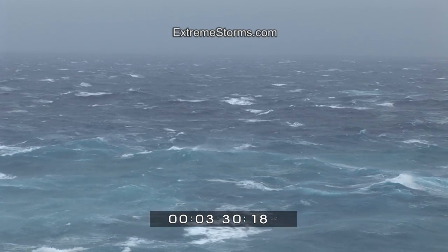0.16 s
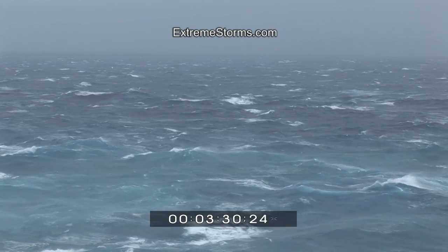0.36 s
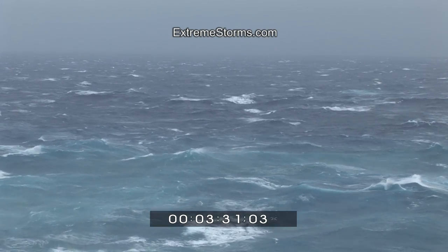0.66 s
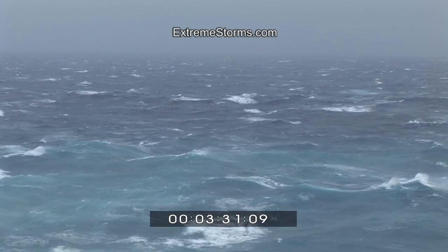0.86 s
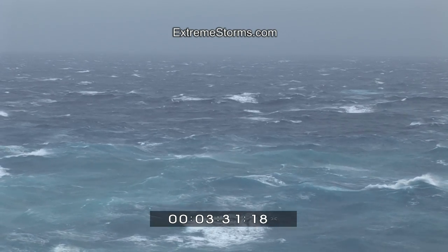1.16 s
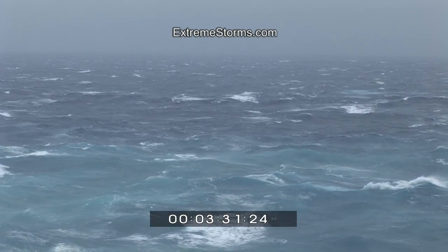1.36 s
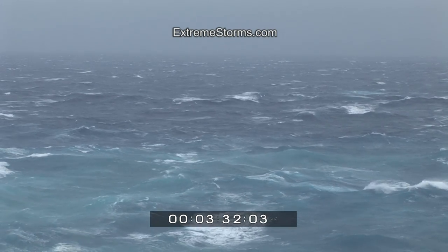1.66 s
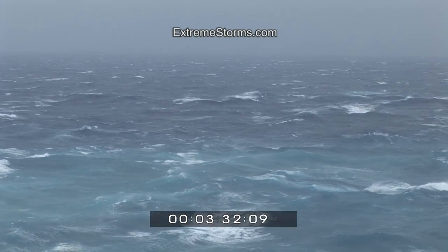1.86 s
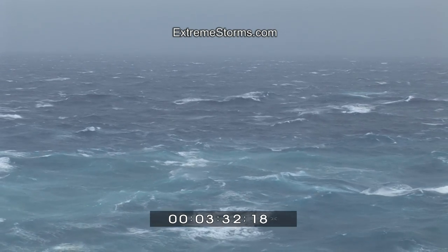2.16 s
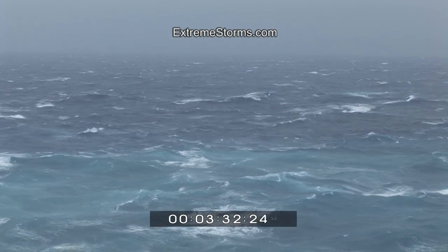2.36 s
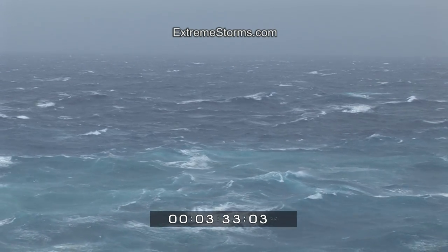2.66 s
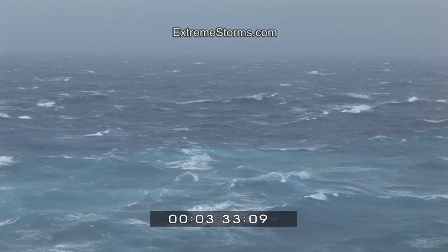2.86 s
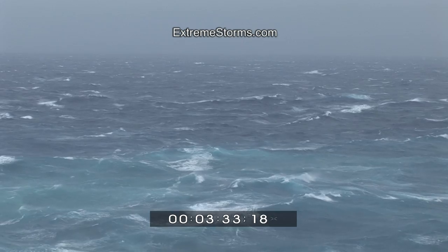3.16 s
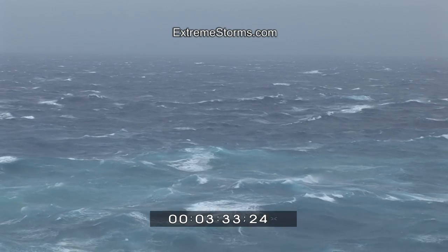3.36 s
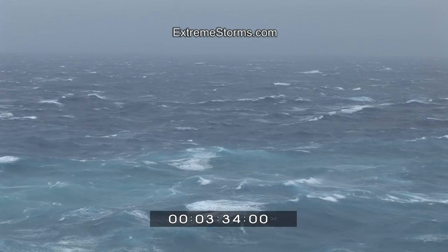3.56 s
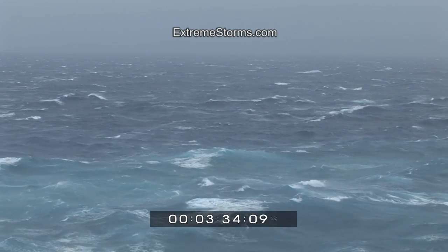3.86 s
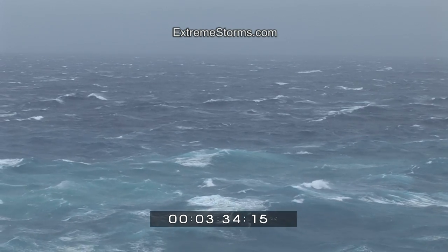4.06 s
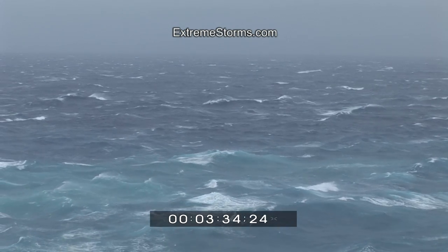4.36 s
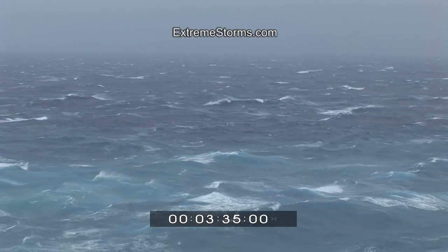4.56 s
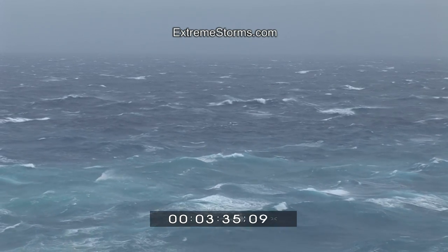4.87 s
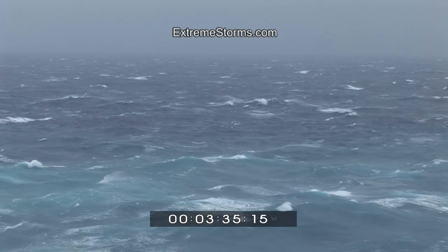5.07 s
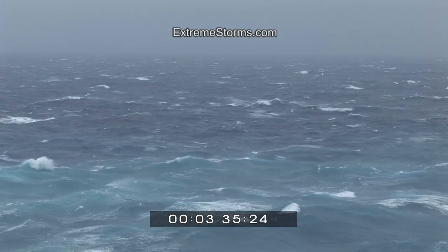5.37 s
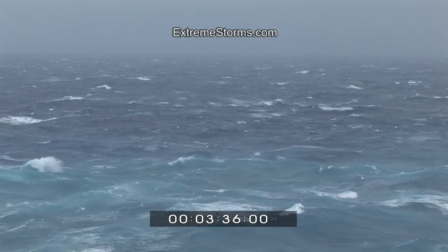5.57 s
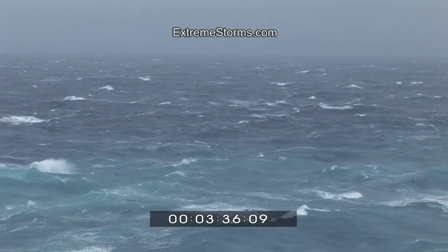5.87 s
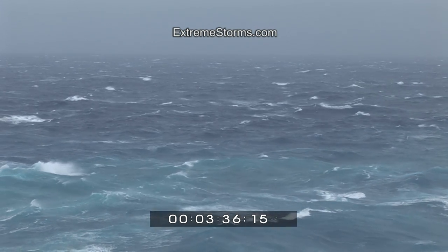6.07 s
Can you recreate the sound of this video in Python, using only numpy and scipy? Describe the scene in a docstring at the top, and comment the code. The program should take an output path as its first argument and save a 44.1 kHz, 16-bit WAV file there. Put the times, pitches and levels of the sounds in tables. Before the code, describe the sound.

Continuous low, fluttering wind buffeting on a camcorder microphone, broken by scratchy clicks, a cluster of thumps midway and crackly rubbing of the cover.

```python
"""Storm wind on a covered microphone

Storm wind buffets the covered microphone of a tape camcorder on a cliff: noise in bands rumbles and roars.
The cover ticks (scratchy bursts and a ring) and rustles (crackly treble noise).
Dull knocks and soft low wobbles in the wind are sine swings, from one swing to a short ring of about six.
Steady hiss lies underneath, with a faint whine of the head drum made of many sine tones.
The right channel hears the same pressure inverted, a little late and with less bass and treble."""
import sys
import numpy as np
from scipy import signal
from scipy.fft import rfft, irfft, next_fast_len
from scipy.io import wavfile
from scipy.ndimage import uniform_filter1d

SR = 44100
rng = np.random.default_rng(int(sys.argv[2]) if len(sys.argv) > 2 else 0)


def inscribe(sig):
    """Save sig as 16-bit PCM at rate SR to the path in sys.argv[1].

    A 1-D sig is mono; a 2-D sig holds one channel per row.
    Samples are clipped to [-1, 1] before scaling.
    """
    pcm = np.round(np.clip(np.atleast_2d(sig).T, -1, 1) * 32767)
    wavfile.write(sys.argv[1], SR, pcm.astype(np.int16))


N = 273532
SIZE = next_fast_len(N)
HZ = np.arange(SIZE // 2 + 1) * SR / SIZE + 1e-3  # pitch of each spectrum bin, kept above zero for logs

# colour of the wind noise before gusts and flutter: (frequency [Hz], density [dB per Hz])
WIND_COLOUR = [(15, -68.5), (45, -52.5), (130, -55), (400, -58.5), (620, -62), (830, -68.5), (1020, -68.5),
               (1300, -75.5), (2200, -86), (2750, -95), (3400, -99), (4500, -109), (5200, -103.5),
               (6100, -105.5), (7200, -125)]


def undb(db):
    """Turn decibels into a gain."""
    return 10 ** (np.asarray(db) / 20)


def curves(table):
    """Draw the columns of a time table as lines, one value per sample."""
    times, *columns = np.transpose(table)
    t = np.arange(N) / SR
    return [np.interp(t, times, column) for column in columns]


def coloured(points, source):
    """Spectrum of a source, coloured by (Hz, dB per Hz) points; the densities hold for unit power."""
    hz, db = np.transpose(points)
    density_db = np.interp(np.log(HZ), np.log(hz), db, -200, -200)
    return rfft(source, SIZE) * undb(density_db) * np.sqrt(SR / 2)


def walk(rate, settle_s=0.28):
    """Random levels held for 1 / rate seconds, smoothed twice, less their slow average; spread near 1."""
    hold = int(SR / rate)
    steps = np.repeat(rng.standard_normal(N // hold + 1), hold)
    smooth = uniform_filter1d(uniform_filter1d(steps, hold), hold)[:N]
    return 1.08 * (smooth - uniform_filter1d(smooth, int(settle_s * SR)))


def grains(rate, spread_db):
    """Dense clicks of very unequal size, about rate per second, with unit power."""
    happens = rng.random(N) < rate / SR
    clicks = rng.standard_normal(N) * happens * undb(spread_db * rng.exponential(size=N))
    return clicks / np.std(clicks)


def add(out, s, sound):
    """Mix a short sound in at s seconds."""
    i = int(s * SR)
    out[i:i + len(sound)] += sound[:N - i]


def wind(all_db=0.74, shared_db=0.86, own_db=1.0):
    """Turbulence in overlapping bands: each follows the gusts, flutters with its neighbour and flickers alone."""
    # slow gusts, of which only the swing about each column's mean is used:
    # (time [s], rumble level [dB], roar level [dB], hissing top level [dB])
    gust = [(0.0, -41, -45.5, -59), (0.52, -42, -47.5, -60), (0.55, -44.5, -47, -60.5),
            (0.76, -41, -47.5, -62), (.95, -40, -45.5, -59), (1.07, -42, -47.5, -59.5),
            (1.2, -36.5, -46.5, -60), (1.33, -41, -46, -61), (1.45, -41.5, -46.5, -60),
            (1.98, -43, -47.5, -62), (2.47, -41.5, -48, -60), (2.76, -41.5, -48.5, -60.5),
            (2.81, -50.5, -46, -60), (2.85, -39, -49, -62.5), (2.95, -35, -44, -60.5),
            (3.02, -33, -46, -60), (3.06, -39.5, -46.5, -60.5), (3.28, -36.5, -47, -59.5),
            (3.47, -39.5, -46.5, -60.5), (3.87, -37, -45.5, -60), (4.28, -38.5, -47.5, -60.5),
            (4.44, -35.5, -47.5, -60), (4.59, -39, -47.5, -62.5), (5.23, -39, -48, -60.5),
            (5.45, -36.5, -46.5, -61), (5.65, -38.5, -45.5, -59.5), (5.84, -36.5, -47, -59.5),
            (5.96, -42, -44.5, -61.5), (5.99, -32.5, -46, -59), (6.2, -40, -46.5, -60.5)]
    swings = [column - column.mean() for column in curves(gust)]
    spectrum = coloured(WIND_COLOUR, rng.standard_normal(N))
    out, last, buffet = 0, walk(14), walk(14)
    for step in range(19):
        octave = np.log2(HZ / 16) - step / 2  # distance from the band centre; centres are half an octave apart
        band_shape = np.cos(np.pi * np.clip(octave, -.5, .5)) ** 2
        band = irfft(spectrum * band_shape, SIZE)[:N]
        # 0 is rumble, 1 is roar, 2 is the hissing top; bands between them blend two gust columns
        place = np.interp(step, (6, 10, 13, 15), (0, 1, 1, 2))
        gust_db = sum(max(1 - abs(place - k), 0) * swing for k, swing in enumerate(swings))
        new = walk(9)
        flutter_db = all_db * buffet + shared_db * (new + last) + own_db * walk(21.93)
        out = out + band * undb(gust_db + flutter_db)
        last = new
    return out


def electronics(whine_db=-101, odd_db=-3, low_db=15):
    """Preamplifier hiss, and the overtones of the head drum leaking into each channel as sine tones."""
    hiss_db, hiss_top_hz = (-117, -118), 13520  # left and right density [dB per Hz]; upper edge
    drum_hz = 149.85
    hiss = irfft(rfft(rng.standard_normal((2, SIZE))) * (HZ < hiss_top_hz), SIZE)[:, :N]
    hiss = hiss * undb(hiss_db)[:, None] * np.sqrt(SR / 2)
    lines = np.zeros((2, len(HZ)), complex)
    for k in range(20, int(hiss_top_hz / drum_hz)):
        scatter_db = 2.5 * rng.standard_normal(2)
        # odd overtones are weaker, the lowest ones stronger
        db = whine_db + odd_db * (k % 2) + low_db * np.exp(-(k - 20) / 12) + scatter_db
        phase = np.exp(2j * np.pi * rng.random(2))
        lines[:, int(k * drum_hz * SIZE / SR)] = undb(db) * phase * SIZE / np.sqrt(2)
    whine = irfft(lines, SIZE)[:, :N] * undb([[0], [-3]])  # weaker on the right
    return hiss + whine


def ticks(grip_s=0.00099, contact_s=0.0013, late_s=0.0012, rise_s=0.0011, blur=1.3, spread=1.46):
    """A scratchy contact of a few ms: a broad crack, a spit on top, then a short rough ring of the housing."""
    # hard ticks on the housing: (time [s], ring peak [dB], ring pitch [Hz], ring time to fall 60 dB [s],
    # spit peak above the ring's [dB], crack peak above the ring's [dB], crack centre [Hz])
    hits = [(0.268, -42, 5200, .015, -14, 8, 2510), (0.2885, -57, 5700, .009, -6, 8, 3400),
            (0.5778, -45.5, 5250, 0.016, -17, 10.5, 2300), (.587, -65, 5600, .009, -14, 2, 2600),
            (.696, -53, 5300, .012, -12, 0, 3000), (1.223, -56, 5400, .008, 2, -2, 4000),
            (1.323, -51.5, 5200, .01, -11, 7, 3200), (1.9435, -61, 5400, .008, -2, 8, 2500),
            (2.4448, -45.5, 5130, .012, -16, 4, 2570), (2.8388, -55, 5330, .008, -10, 22, 2060),
            (2.9197, -64, 5300, .01, -8, 18, 2900), (2.948, -62, 5300, .01, -6, 14, 3200),
            (2.9793, -49, 5740, .009, -3, 11.5, 3040), (3.0045, -52, 5900, .008, -2, 5, 4300),
            (3.632, -58, 5100, .01, -8, 8, 3300), (3.915, -52.5, 5700, .009, -10, 8, 3300),
            (3.929, -56, 5700, .009, -20, 0, 3000), (3.962, -57, 5300, .009, -16, 2, 3000),
            (4.343, -63, 5200, .007, -6, 15, 2700), (4.375, -55, 5500, .007, -3, 6, 3900),
            (4.8814, -46, 5550, .007, -5, 4.5, 3400), (5.845, -53.5, 5530, .007, -5, 4, 3400)]
    # ways the housing rings: (multiple of the ring pitch [ratio], level [dB], share of the ring time [ratio])
    housing = [(1, 0, 1), (1.17, 0, .45), (.84, -11, 0.21)]
    out, t = np.zeros(N), np.arange(SR // 32) / SR
    spit_band = signal.butter(2, (3800, 12500), "bandpass", fs=SR, output="sos")
    for s, db, hz, ring_s, spit_db, crack_db, crack_hz in hits:
        chance = rng.standard_normal(len(t))
        contact = chance * (1 - np.exp(-t / grip_s)) * np.exp(-t / contact_s)
        crack_edges = (crack_hz / spread, crack_hz * spread)
        crack_band = signal.butter(2, crack_edges, "bandpass", fs=SR, output="sos")
        dulled = signal.lfilter([1], [1, -.95], contact)
        crack = signal.sosfilt(crack_band, dulled)
        spit = signal.sosfilt(spit_band, contact)
        ring = sum(undb(mode_db) * np.sin(2 * np.pi * multiple * hz * t) * 1000 ** (-t / (share * ring_s))
                   for multiple, mode_db, share in housing)
        rough = 1 + blur * uniform_filter1d(chance[::-1], size=25)
        ring = ring * (1 - np.exp(-t / rise_s)) * rough
        for part, part_db, lag_s in ((ring, 0, late_s), (crack, crack_db, 0), (spit, spit_db, 0)):
            add(out, s + lag_s, undb(db + part_db) * part / abs(part).max())
    return out


def knocks_and_wobbles():
    """The pressure swings to and fro: from one swing to a short ring of about six, in a bell shape."""
    # dull knocks and soft low wobbles in the wind:
    # (time of the middle [s], peak [dB], swing pitch [Hz], width of the bell [swings])
    blows = [(.272, -27.5, 1070, 6.4), (.579, -25.5, 1000, 1.6), (2.8404, -15.5, 640, 1.4),
             (2.8425, -20.5, 520, 1.1), (2.8463, -25.5, 220, 0.83), (2.943, -35, 300, 0.81),
             (2.981, -10, 686, 1), (2.9835, -20, 320, 1.9), (2.989, -32, 800, 1.2), (3.0098, -21, 700, 2),
             (3.0128, -12.5, 497, 1.16), (3.0155, -25, 370, 2.3), (3.022, -27, 520, 2),
             (3.0295, -11.5, 430, 1.4), (3.0328, -14, 250, 2.3), (3.049, -26, 580, 3),
             (3.086, -20.5, 676, 1.7), (3.31, -33, 1400, 4), (3.3168, -32, 1410, 5.5),
             (3.323, -34, 1300, 4), (3.863, -34, 1650, 3.7), (3.874, -18, 900, 1.14),
             (3.875, -38, 1450, 3.3), (3.9072, -29, 1250, 1.6), (3.912, -25, 900, 1.3),
             (4.159, -24, 480, 1.1), (4.1617, -20, 950, 1.2), (5.545, -29, 800, 1.1),
             (6.0452, -23.5, 596, 3.3)]
    out, t = np.zeros(N), np.arange(-400, 400) / SR
    for s, db, hz, swings in blows:
        bell = np.exp(-(2.7 * t * hz / swings) ** 2)
        swing = -np.sin(2 * np.pi * hz * t) * bell
        add(out, s + t[0], undb(db) * swing / abs(swing).max())
    return out


def rustle(rise_s=0.0091, fall_s=0.024, split_hz=8500, fray_db=2.5):
    """Rubbing fabric: short stretches of crackly treble noise that fray band by band, some brighter."""
    # colour of the rubbing before each rub's own gain: (frequency [Hz], density [dB per Hz])
    colour = [(2000, -25), (3200, -25), (4400, -37.5), (5300, -27.5), (6200, -31.5), (6700, -46),
              (7500, -40), (10000, -41), (12300, -35), (13400, -33), (14250, -36), (14500, -55)]
    # rubs of the cover: (time [s], length [s], gain [dB], treble raised and the rest lowered by [dB])
    rubs = [(0.692, 0.026, -75, 0), (1.002, .045, -78, -2), (2.967, 0.041, -70.5, -5),
            (3.034, 0.091, -76.5, -3), (3.126, 0.022, -71, 10), (3.144, .022, -80, 8),
            (3.165, 0.088, -68, 3.5), (3.166, .014, -74, 5), (3.187, .016, -75, 1), (3.208, .036, -69, 2),
            (3.225, 0.019, -69, -4), (3.56, 0.033, -80, -5), (3.596, 0.038, -73, -4.5),
            (3.895, 0.044, -76, -4), (3.96, .08, -79, -1), (5.005, 0.091, -81, 1), (5.377, .03, -76, -4)]
    rub = coloured(colour, rng.standard_normal(N) + 0.31 * grains(4000, 3.0))
    low, high = 0, 0
    for step in range(11):
        octave = np.log2(HZ / 1800) - step / 3  # band centres a third of an octave apart
        band_shape = np.cos(np.pi * np.clip(1.5 * octave, -.5, .5)) ** 2
        band = irfft(rub * band_shape, SIZE)[:N]
        band = band * undb(fray_db * walk(95))
        centre_hz = 1800 * 2 ** (step / 3)
        bright = 1 / (1 + (split_hz / centre_hz) ** 6)  # share that counts as treble
        low = low + band * (1 - bright)
        high = high + band * bright
    t, out = np.arange(N) / SR, 0
    for s, length, db, lift_db in rubs:
        ramps = np.minimum((t - s) / rise_s, (s + length - t) / fall_s)
        gate = np.clip(ramps + .5, 0, 1) ** 2
        out = out + gate * undb(db) * (low / undb(lift_db) + high * undb(lift_db))
    return out


def scene(apart_db=-11, apart_hz=1500):
    """One pressure feeds both channels; the right path inverts, thins and delays it."""
    # loudness of the right path against the left: (frequency [Hz], gain [dB])
    right_gain = [(10, -20), (30, -17.5), (60, -13.5), (125, -8.7), (250, -5.5), (500, -3.8), (1000, -2.9),
                  (2000, -2.1), (2800, -2.6), (3400, -4.3), (4000, -8.5), (6000, -13), (7500, -30)]
    bass_hz, late_s = 227, 135e-6
    left = wind() + ticks() + knocks_and_wobbles() + rustle()
    hz, db = np.transpose(right_gain)
    # the bass cut turns the phase of the lows ahead, the lag turns the highs back
    turn = np.arctan(bass_hz / HZ) - 2 * np.pi * HZ * late_s
    path = -undb(np.interp(np.log(HZ), np.log(hz), db)) * np.exp(1j * turn)
    # small eddies reach one port only, so the treble is partly unrelated
    apart = coloured(WIND_COLOUR, rng.standard_normal(N)) * undb(apart_db) * HZ / (apart_hz + HZ)
    right = irfft(rfft(left, SIZE) * path + apart, SIZE)[:N]
    return np.array([left, right]) + electronics()


def record(dry):
    """The recorder cuts the top: a steep low-pass filter removes what lies above 14.9 kHz."""
    top_cut = signal.ellip(10, .2, 80, 14900, fs=SR, output="sos")  # 0.2 dB ripple, 80 dB cut
    return signal.sosfilt(top_cut, dry)


dry = scene()
out = record(dry)
inscribe(out)
```